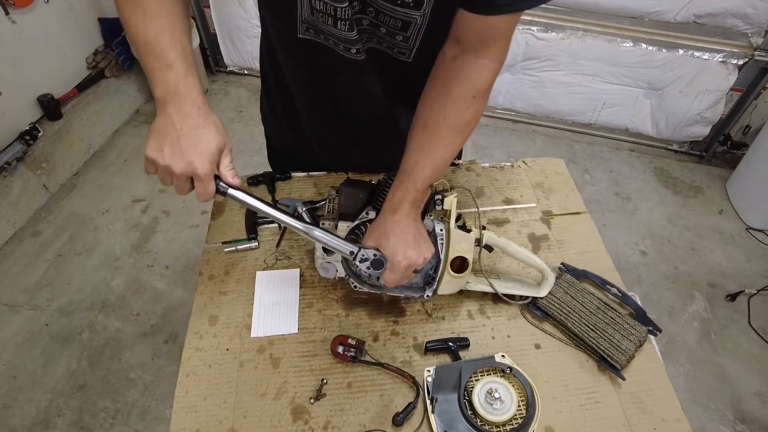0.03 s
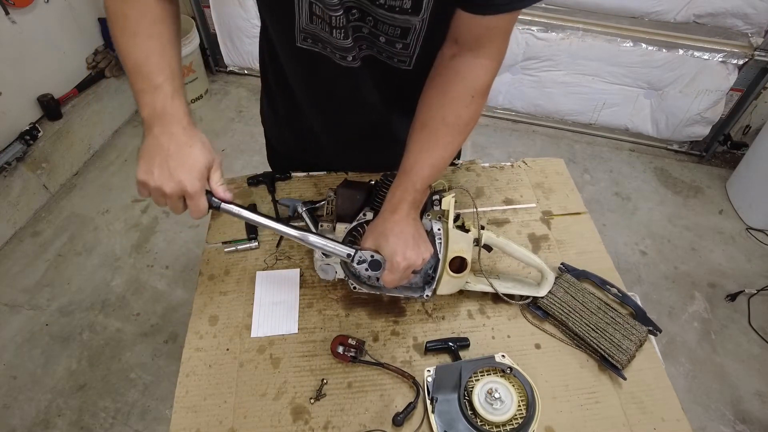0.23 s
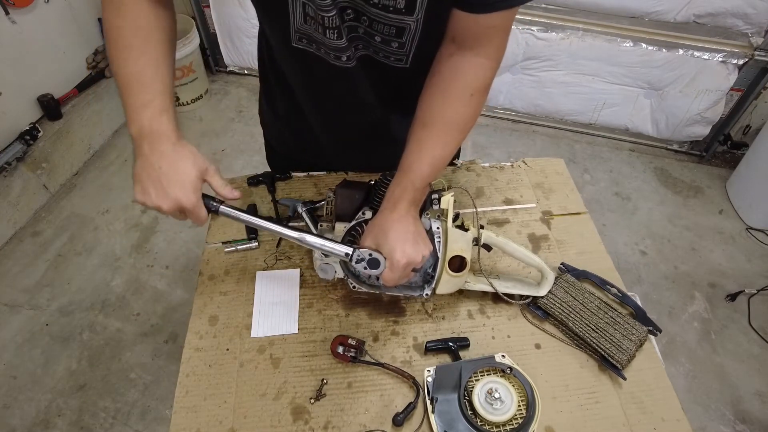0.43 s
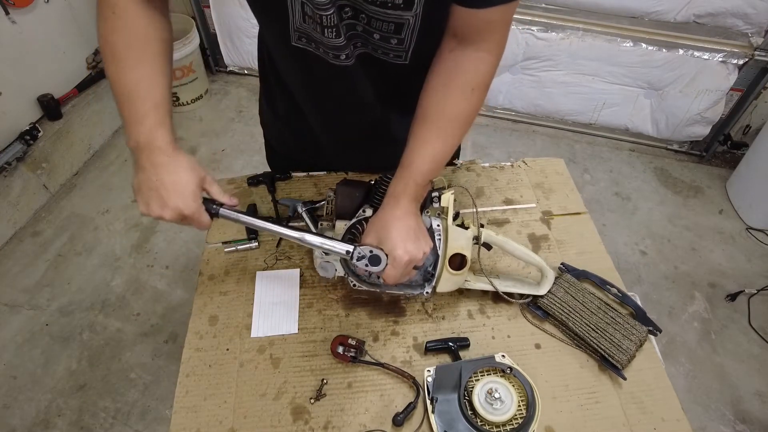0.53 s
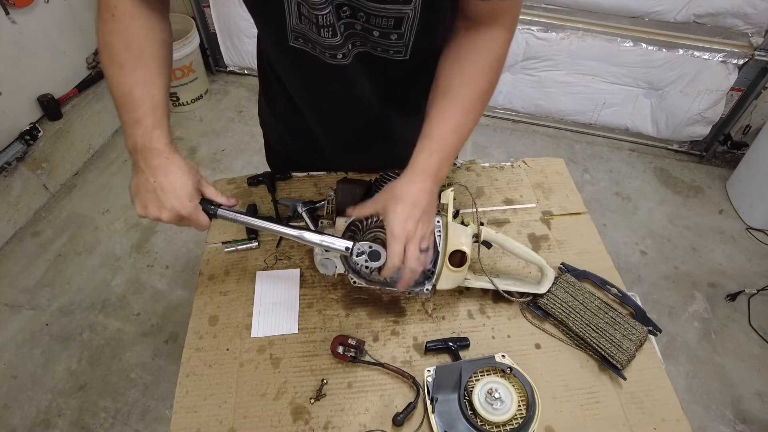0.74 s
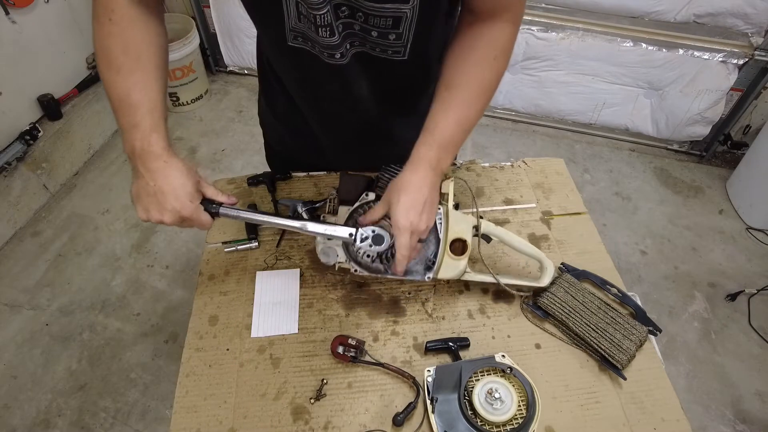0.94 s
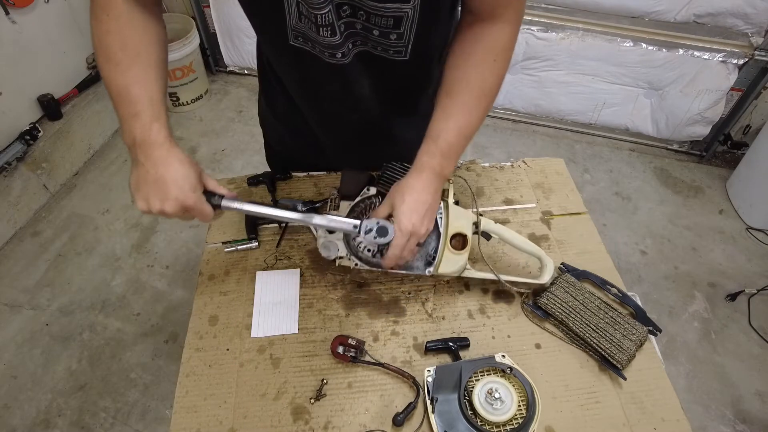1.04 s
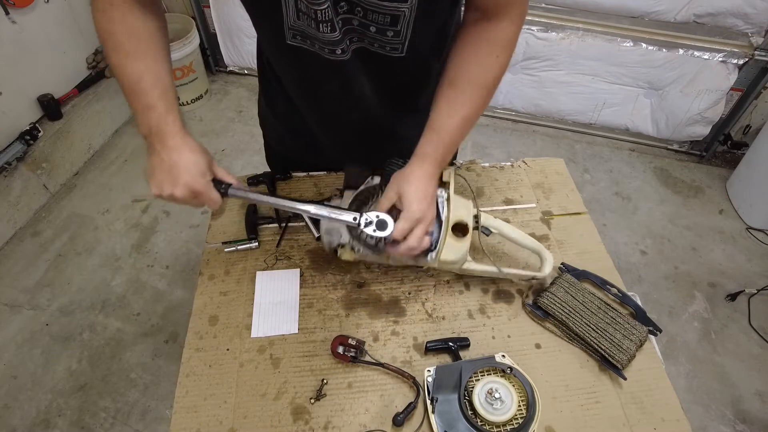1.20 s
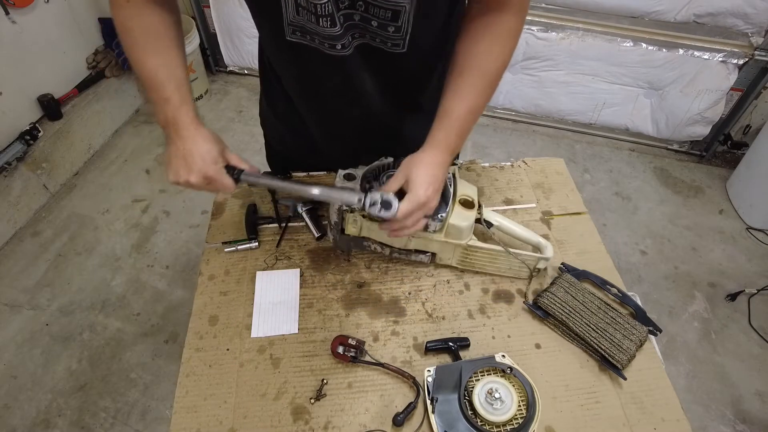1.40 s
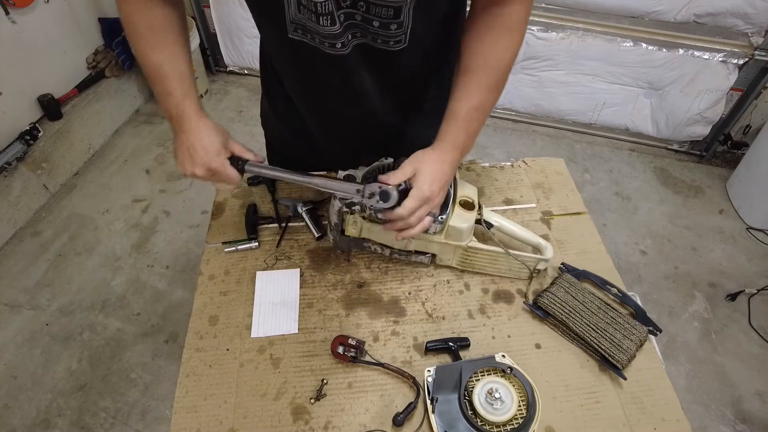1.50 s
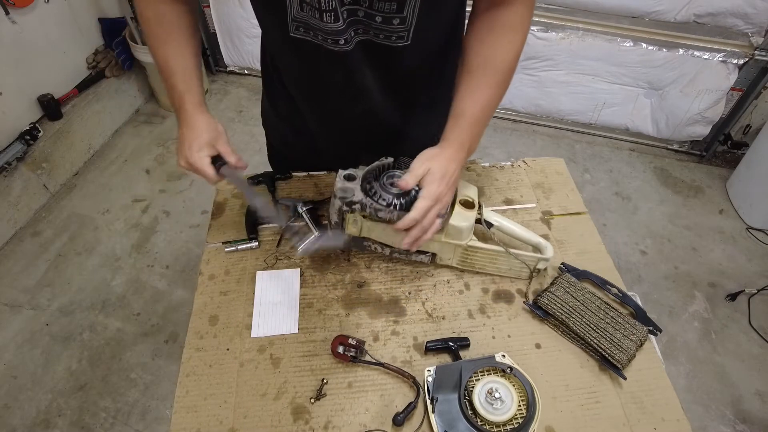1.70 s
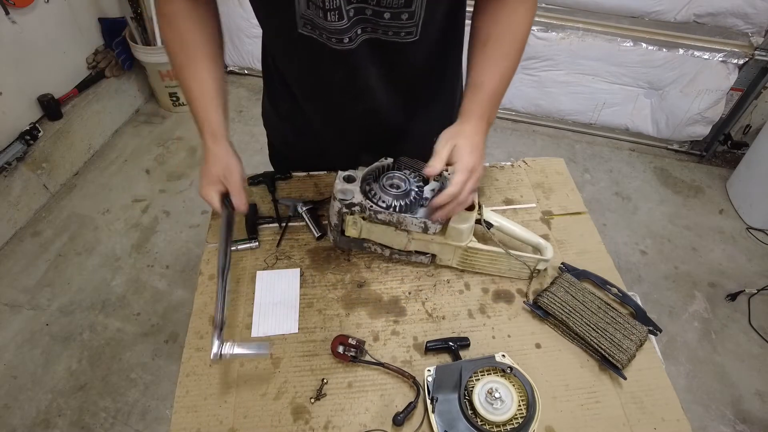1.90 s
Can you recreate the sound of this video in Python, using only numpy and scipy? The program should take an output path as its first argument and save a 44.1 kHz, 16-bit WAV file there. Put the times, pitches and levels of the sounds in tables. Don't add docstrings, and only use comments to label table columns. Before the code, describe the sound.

A torque wrench clicks hard at 0.2 s, a bright double snap with a short woody thunk from housing and bench. Faint grip and ratchet ticks follow from 0.5 to 1.1 s. Around 1.13-1.3 s the housing drags and bumps on cardboard as the socket slips and clinks. At 1.37 s it snaps off, ringing briefly. Half-second garage reverberation, quiet low hum, faint last ticks near 1.8-1.9 s.

```python
import sys
import numpy as np
from scipy import signal
from scipy.io import wavfile
from scipy.ndimage import uniform_filter1d, map_coordinates

SR = 44100
rng = np.random.default_rng(int(sys.argv[2]) if len(sys.argv) > 2 else 0)


def store_wav(level_fs):
    pcm = np.round(np.clip(np.atleast_2d(level_fs), -1, 1) * 32767)
    wavfile.write(sys.argv[1], SR, pcm.T.astype(np.int16))


def invert_db(x):
    u = np.asarray(x, float) / 20
    return 10 ** u


N = 85995


def curve(points, hz):
    pitch_hz, value = np.transpose(points)
    return np.interp(np.log(hz), np.log(pitch_hz), value)


def band(x, hz, width):
    low = max(hz - width / 2, hz / 4)
    high = min(low + width, SR / 2.2)
    y = signal.sosfilt(signal.butter(2, [low, high], "band", fs=SR, output="sos"), x)
    return y / np.std(y)


def walk(rate_hz):
    span = int(SR / rate_hz)
    wander = uniform_filter1d(uniform_filter1d(rng.standard_normal(N), span), span)
    return wander / np.std(wander)


# pitch_hz, density_db (per Hz)
AIR_SPECTRUM = [(15, -27), (25, -1), (243, -10.5), (335, -19.5), (709, -30.5), (1240, -34), (4260, -46),
                (5720, -44), (15000, -66)]
# pitch_hz, side_minus_mid_db
AIR_SPREAD = [(30, -8.5), (80, -20.5), (250, -5.5), (1000, -3.5), (10000, 2.5)]
# pitch_hz, level_db
HUM_PARTIALS = [(31, -54.5), (95, -58.5), (120, -65.5), (189, -57)]


def air():
    noise, swell = 0, walk(2.2)
    for hz in 28 * 2 ** np.arange(0, 9.2, 0.5):
        level_db = curve(AIR_SPECTRUM, hz) + 10 * np.log10(hz) + 0.9 * swell + 1.8 * walk(14)
        spread = invert_db(np.array([[0], [curve(AIR_SPREAD, hz)]]))
        noise = noise + invert_db(level_db) * band(rng.standard_normal((2, N)), hz, hz * 0.32) * spread
    noise = noise / np.std(noise[0]) * invert_db(-53.5)

    hum = np.zeros(N)
    for hz, level_db in HUM_PARTIALS:
        level = invert_db(level_db + 3.0 * walk(3.2))
        phase = np.cumsum(2 * np.pi * hz * (1 + 0.015 * walk(6)) / SR)
        hum += level * np.sin(phase)
    return noise + np.array([hum, hum * invert_db(-16.5)])


def earlier_knock(t):
    level_db, t60_s = -62, 0.34
    return invert_db(level_db - 60 * t / t60_s) * band(rng.standard_normal((2, N)), 4200, 5500)


def lingering_ring(t):
    level_db, pitch_hz, t60_s = -70.5, 6300, 1.8
    return invert_db(level_db - 60 * t / t60_s) * np.sin(2 * np.pi * pitch_hz * t)


def struck(strikes, modes, crack):
    scatter_db = 2
    out, t = np.zeros((2, N)), np.arange(SR // 2) / SR
    crack_db, crack_hz, width_hz, t60_ms, rise_ms = crack
    scatter = rng.standard_normal((len(strikes), len(modes)))
    for (start_s, level_db, decay_scale), chances in zip(strikes, scatter):
        ring, sign = np.zeros(len(t)), 1
        for (hz, mode_db, t60_s), chance in zip(modes, chances):
            envelope = invert_db(mode_db + scatter_db * chance - 60 * t / (t60_s * decay_scale))
            ring += sign * envelope * np.sin(2 * np.pi * hz * t)
            sign = -sign
        noise = band(rng.standard_normal(len(t)), crack_hz, width_hz)
        snap = invert_db(crack_db - 60 * t / (t60_ms / 1000)) * noise
        rise = 1 - np.exp(-t / (rise_ms / 1000))
        i = int(start_s * SR)
        out[:, i:i + len(t)] += (invert_db(level_db) * np.array([ring, snap]) * rise)[:, :N - i]
    return out


# start_s, level_db, pitch_hz, t60_s
GRIP_TICKS = [(.178, -51, 994, .07), (.195, -48.5, 4530, .06), (.526, -53.5, 1240, .022),
              (.539, -48.5, 1060, .055), (.601, -53, 1400, .028), (.602, -58.5, 4260, 0.021),
              (.625, -62, 1300, .035), (.64, -60.5, 6130, .05), (.636, -63, 4700, .035),
              (.71, -60, 4460, .07), (0.713, -68.5, 5670, .6), (.712, -60, 7200, .045),
              (.735, -69, 5100, .14), (0.9247, -42.5, 1200, .02), (.925, -53.5, 2800, .025),
              (.988, -51, 657, .055), (1.053, -43.5, 1044, .028), (1.056, -59, 2060, .14),
              (1.078, -52.5, 2050, .09), (1.088, -55.5, 966, 0.13), (1.08, -55, 5220, .035),
              (1.82, -65.5, 3200, .035), (1.905, -69, 6000, .011), (1.931, -65, 7000, .011),
              (1.9, -63, 1482, .09), (1.93, -59, 1513, .055), (1.13, -44, 388, .035),
              (.602, -53, 860, .035)]


def ticks():
    out = np.zeros((2, N))
    for start_s, level_db, hz, t60_s in GRIP_TICKS:
        pair = [(hz, 0, t60_s), (hz * 1.03, -6, t60_s * 0.24)]
        crack = (-2, hz, hz * 0.64, 15, 0.4)  # level_db, pitch_hz, width_hz, t60_ms, rise_ms
        out += struck([(start_s, level_db, 1)], pair, crack)
    return out


# pitch_hz, level_db, t60_s, side_db
GARAGE_BANDS = [(182, -11, .45, -7), (383, -9, .42, -3), (686, -13.5, 0.43, -3), (1400, -11.5, 0.44, -3.5),
                (2800, -16.5, 0.51, -5.5), (5000, -15, 0.5, 0), (8600, -20.5, 0.47, 1),
                (14000, -10.5, 0.41, 1)]


def garage(x):
    first_echo_s, build_s = 0.003, 0.0018
    t = np.arange(SR) / SR
    rise = 1 - np.exp(-np.clip(t - first_echo_s, 0, None) / build_s)
    tail = np.zeros((2, SR))
    for hz, level_db, t60_s, side_db in GARAGE_BANDS:
        envelope = invert_db(np.array([[level_db], [level_db + side_db]]) - 60 * t / t60_s)
        tail += envelope * np.sqrt(hz / SR) * band(rng.standard_normal((2, SR)), hz, hz * 0.65)
    return signal.fftconvolve(x[None], tail * rise * invert_db(-23), axes=1)[:, :N]


# start_s, level_db, decay_scale (ratio)
PAWL_STRIKES = [
    (.2060, -11.5, .8),
    (.2079, -9.5, 0.62),
    (.2125, -26.5, .9),
]
# pitch_hz, level_db, t60_s
PAWL_MODES = [(1154, 1, 0.012), (1650, -11, 0.011), (2970, -18.5, .02), (3500, -6.5, .018),
              (4700, 7.5, 0.0082), (5095, -2.5, 0.017), (5570, -5, 0.022), (4093, -11.5, .01),
              (7300, -27, .02), (8400, -27, 0.02), (10700, -23, .012), (11800, -20.5, .008),
              (14500, -23, .008)]
# level_db, pitch_hz, width_hz, t60_ms, rise_ms
PAWL_CRACK = (-5.5, 4799.5, 4499.5, 7.5, .5)


def pawl_snap():
    return struck(PAWL_STRIKES, PAWL_MODES, PAWL_CRACK)


# start_s, level_db, decay_scale (ratio)
BENCH_BLOWS = [
    (.2064, -22, 0.77),
    (.2156, -21, 0.8),
]
# pitch_hz, level_db, t60_s
BENCH_MODES = [(247, -11, .14), (428.6, -16, 0.42), (874.6, 0, .065), (781.6, -10.5, 0.045),
               (951, -4.5, .06), (1328, -14, .1), (132, -16.5, 0.055), (336, -18, 0.071)]
# level_db, pitch_hz, width_hz, t60_ms, rise_ms
BENCH_CRACK = (-1.5, 1099.5, 1797, 16, 0.41)


def bench_blow():
    return struck(BENCH_BLOWS, BENCH_MODES, BENCH_CRACK)


# centre_s, half_length_s, level_db, pitch_hz, width_hz
RUB_SWELLS = [
    (.64, .015, -77, 8000, 6000),
    (.712, .012, -73, 8000, 7000),
    (.98, .018, -78, 8000, 8000),
    (1.083, .022, -73, 6000, 9000),
    (.82, .03, -73, 2900, 1200),
    (.915, .022, -72, 2900, 1400),
    (1.085, .028, -68, 3000, 1200),
    (1.256, .036, -49, 950, 800),
    (1.251, .046, -55, 3500, 5000),
]


def rubs(t):
    grit = rng.standard_normal(N) * invert_db(3.3 * walk(150))
    out = np.zeros(N)
    for centre_s, half_s, level_db, hz, width_hz in RUB_SWELLS:
        out += invert_db(level_db) * band(grit, hz, width_hz) * np.exp(-((t - centre_s) / half_s) ** 2)
    return out


# start_s, level_db, decay_scale (ratio)
BUMP_STRIKES = [(1.129, -51.5, 0.65), (1.1733, -41.5, .9), (1.1765, -42, 0.68), (1.2105, -36, .9),
                (1.2195, -43.5, 1), (1.2465, -30, .9), (1.2545, -41.5, .9), (1.2595, -39, 1),
                (1.263, -37, .9), (1.2738, -43, 0.67), (1.296, -43.5, .9)]
# pitch_hz, level_db, t60_s
CARDBOARD_MODES = [(423, -15, .035), (655, -5, .06), (733, -6.5, 0.1), (906, -7.5, 0.034), (1113, 1, 0.018),
                   (1500, -9.5, 0.015), (2800, -5.5, 0.02)]
# level_db, pitch_hz, width_hz, t60_ms, rise_ms
CARDBOARD_CRACK = (-1, 800, 1200, 15, .3)


def housing_bumps():
    return struck(BUMP_STRIKES, CARDBOARD_MODES, CARDBOARD_CRACK)


# start_s, level_db, decay_scale (ratio)
SLIP_STRIKES = [
    (1.1932, -44.5, .9),
    (1.1953, -36, 1),
]
# pitch_hz, level_db, t60_s
SLIP_RING = [(2200, -1, .02), (4770, -17, 0.35), (5400, -1, 0.032), (6300, -8, 0.019), (8970, -22.5, .08),
             (13000, -24, .08)]
# level_db, pitch_hz, width_hz, t60_ms, rise_ms
SLIP_NOISE = (0, 2798, 3995, 28, 0.9)


def socket_slip():
    return struck(SLIP_STRIKES, SLIP_RING, SLIP_NOISE)


# start_s, level_db, decay_scale (ratio)
CLINK_STRIKES = [
    (1.2297, -32, 1),
    (1.2325, -41, .9),
]
# pitch_hz, level_db, t60_s
CLINK_RING = [(986, 0, 0.056), (2056, -3, 0.018), (2430, 2.5, 0.024), (3524, 1, .05), (4730, -16, .1),
              (5050, -14.5, 0.51), (5430, -9.5, .03), (6060, -10.5, .02), (9250, -25.5, 0.25),
              (10660, -30.5, 0.25), (10700, -13, 0.032), (12900, -31, .1), (14500, -32, 0.36),
              (15300, -23, .05)]
# level_db, pitch_hz, width_hz, t60_ms, rise_ms
CLINK_NOISE = (-3, 2794.5, 3995, 32, 0.26)


def socket_clink():
    return struck(CLINK_STRIKES, CLINK_RING, CLINK_NOISE)


# start_s, level_db, decay_scale (ratio)
PULL_STRIKES = [
    (1.3731, -20, 0.81),
    (1.3741, -13, 0.88),
    (1.3768, -24, 0.73),
]
# pitch_hz, level_db, t60_s
PULL_RING = [(622, -17.5, 0.058), (984, -15, .19), (1403, 3.5, 0.023), (1170, -11, 0.026),
             (2014, -4, 0.031), (2876, -6, 0.044), (3436, -1.5, 0.037), (1647, -3, 0.032),
             (5277, 0.5, .013), (6720, -2.5, 0.011), (430, -28.5, .08), (10440, -13.5, .011),
             (11450, -27, 0.026)]
# level_db, pitch_hz, width_hz, t60_ms, rise_ms
PULL_NOISE = (-3, 2497.5, 3598, 18.5, 0.47)


def socket_pull():
    return struck(PULL_STRIKES, PULL_RING, PULL_NOISE)


def scene():
    t = np.arange(N) / SR
    ring, crack = (pawl_snap() + bench_blow() + socket_pull() + socket_clink()
                   + socket_slip() + housing_bumps() + ticks())
    near = ring + crack + rubs(t) + lingering_ring(t)
    wet = garage(invert_db(-3) * ring + invert_db(5) * crack)
    room = air()
    before = earlier_knock(t)

    sides = np.array([[1], [-1]])
    before_side_db, pan_db, right_late_samples = -1.5, 1.5, 0.83
    tail = wet[0] + before[0] + sides * (wet[1] + invert_db(before_side_db) * before[1])
    late = map_coordinates(near, [np.arange(N) - right_late_samples], mode="nearest")
    ports = np.array([near, late])
    return (ports + tail) * invert_db(sides * pan_db / 2) + room[0] + sides * room[1]


def band_limit(x):
    return signal.sosfilt(signal.butter(12, 16720, fs=SR, output="sos"), x)


def record(dry):
    top_cut = signal.ellip(8, 0.2, 70, 16600, fs=SR, output="sos")
    mix = signal.sosfilt(top_cut, dry)
    return band_limit(mix)


dry = scene()
out = record(dry)
store_wav(out)
```